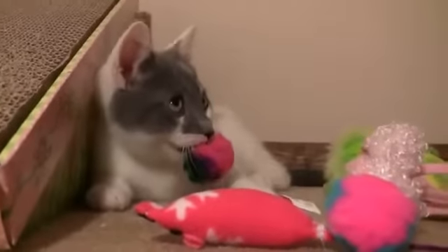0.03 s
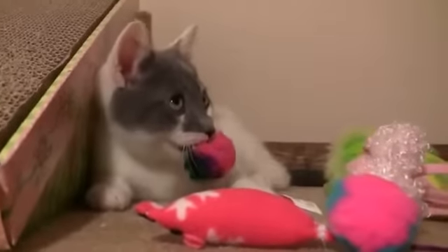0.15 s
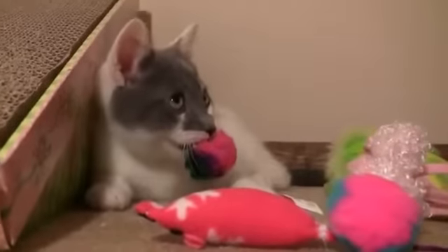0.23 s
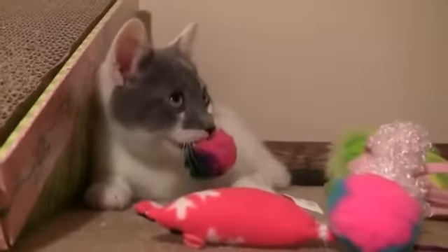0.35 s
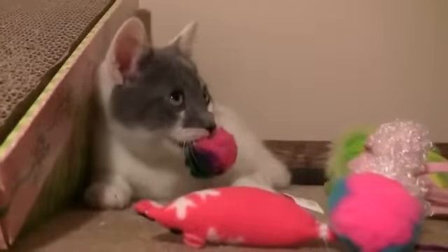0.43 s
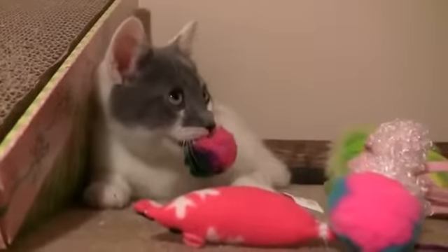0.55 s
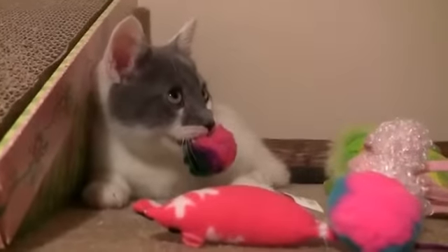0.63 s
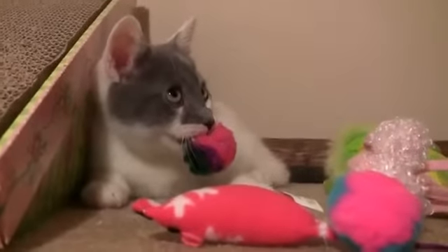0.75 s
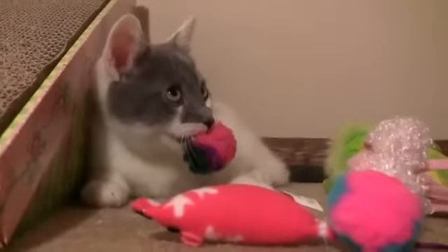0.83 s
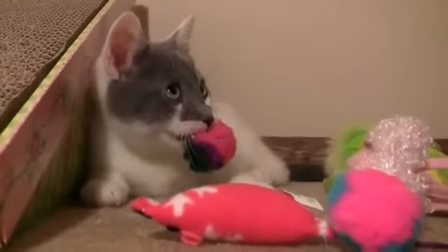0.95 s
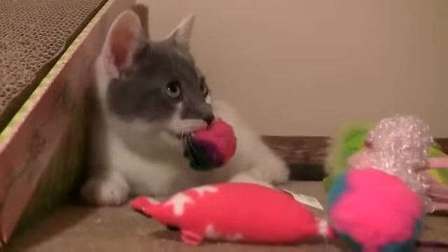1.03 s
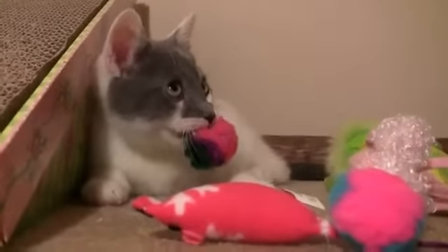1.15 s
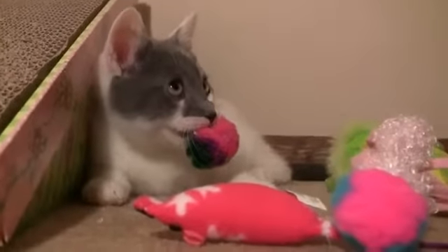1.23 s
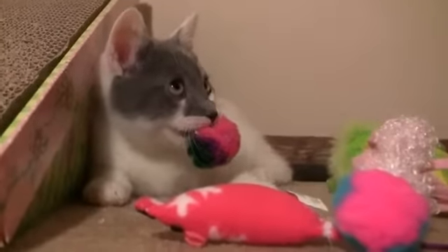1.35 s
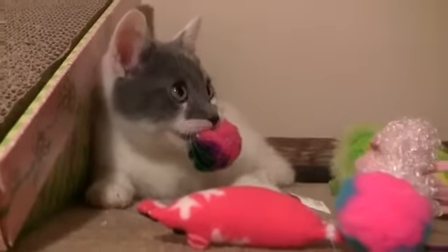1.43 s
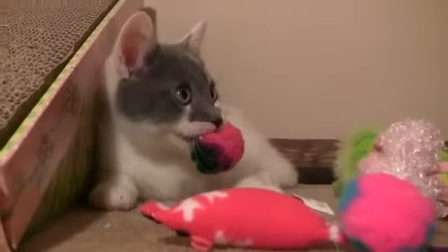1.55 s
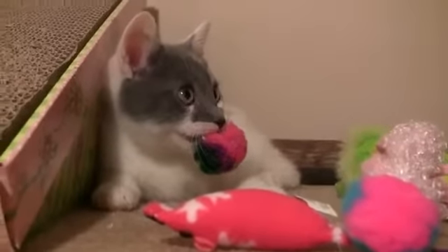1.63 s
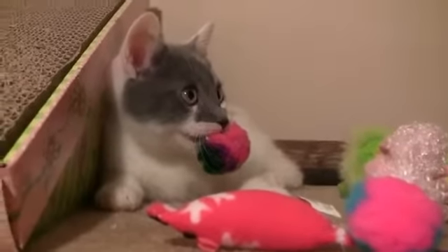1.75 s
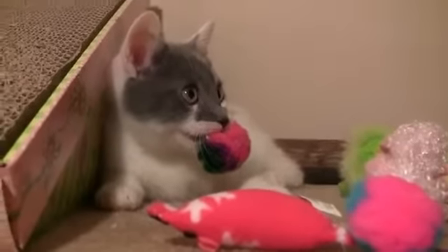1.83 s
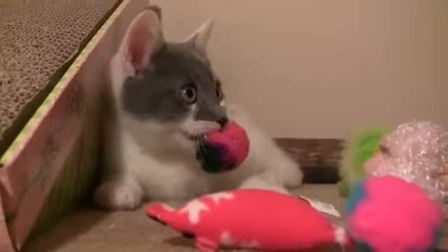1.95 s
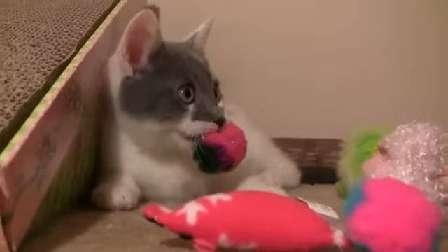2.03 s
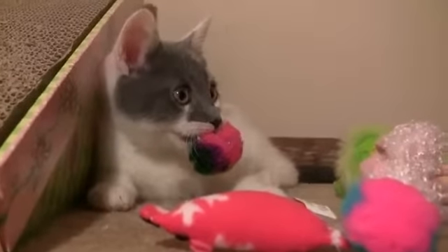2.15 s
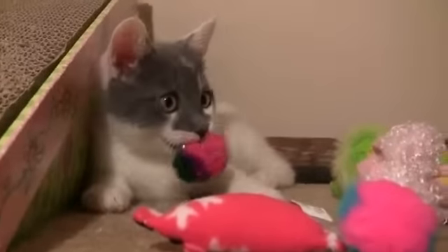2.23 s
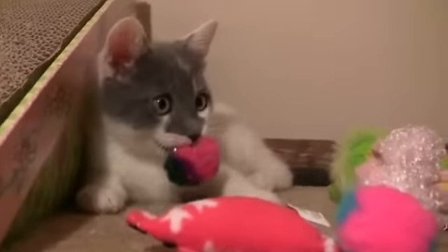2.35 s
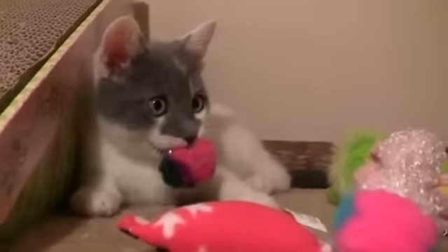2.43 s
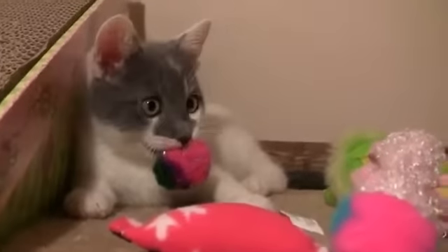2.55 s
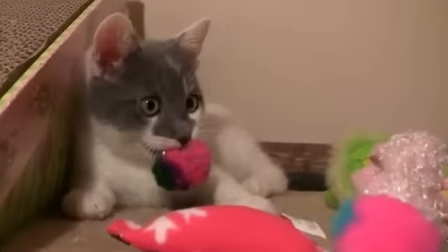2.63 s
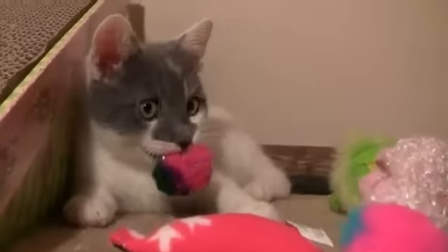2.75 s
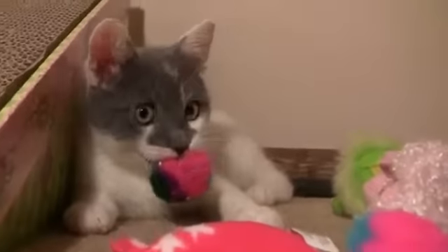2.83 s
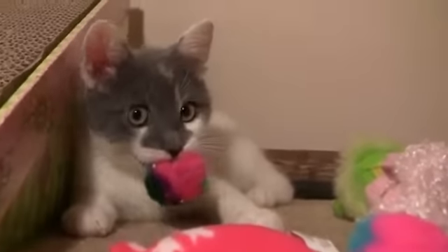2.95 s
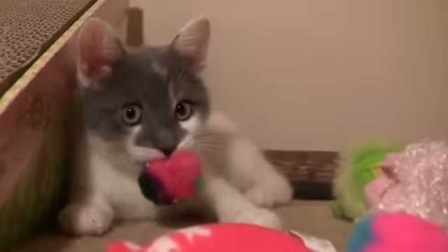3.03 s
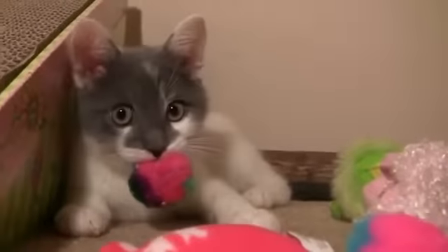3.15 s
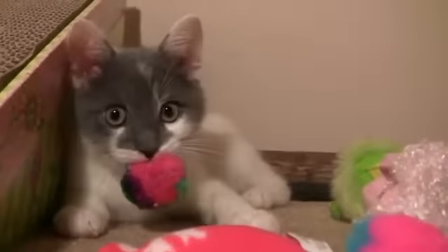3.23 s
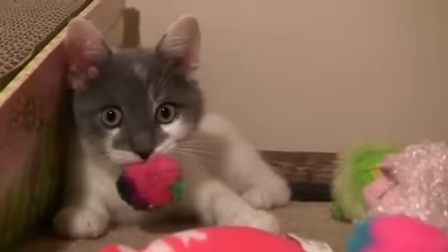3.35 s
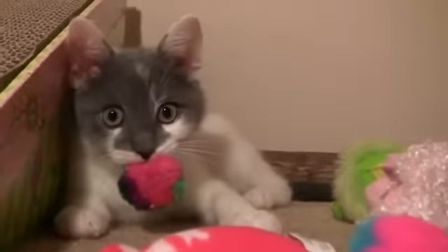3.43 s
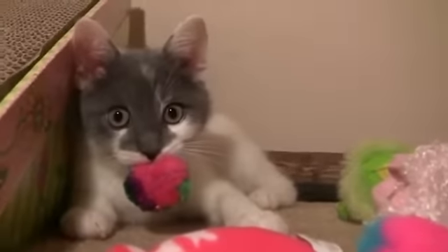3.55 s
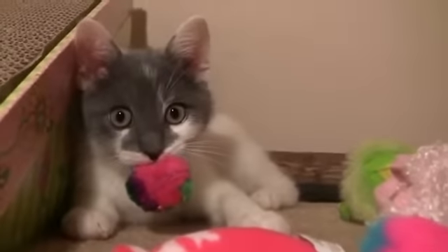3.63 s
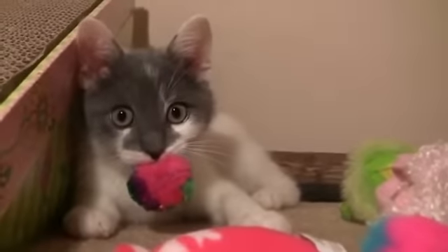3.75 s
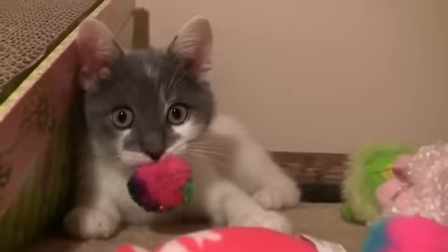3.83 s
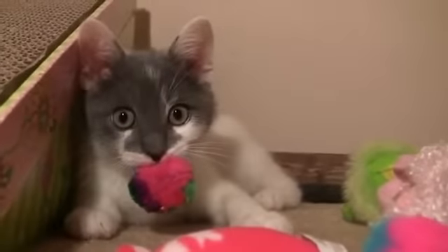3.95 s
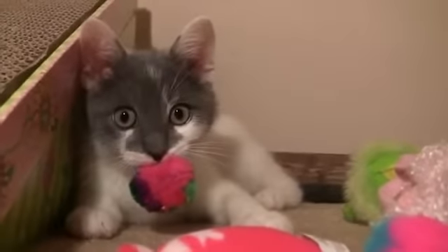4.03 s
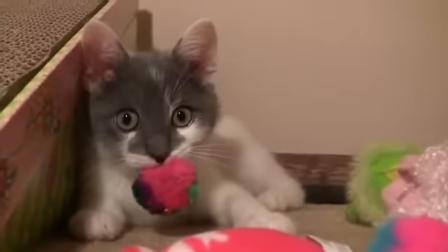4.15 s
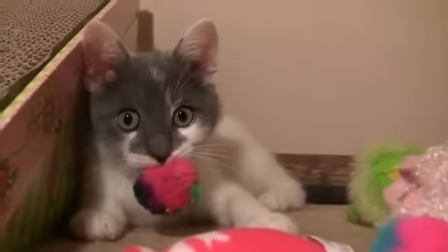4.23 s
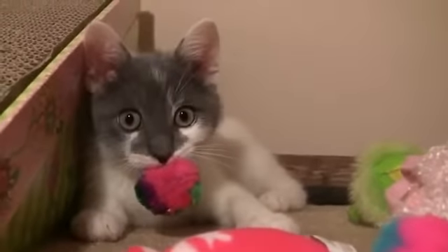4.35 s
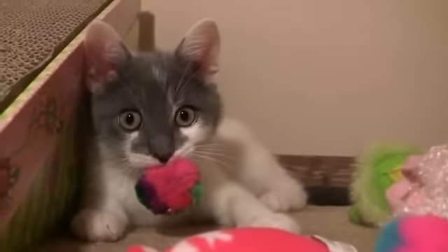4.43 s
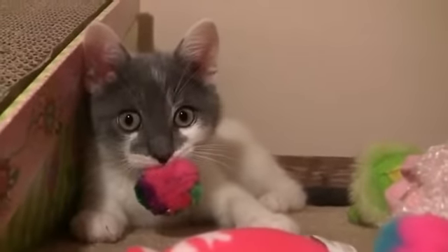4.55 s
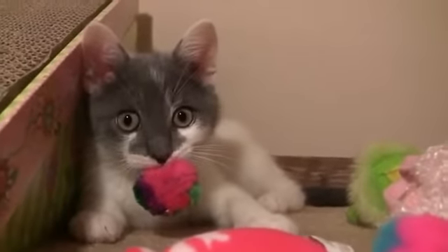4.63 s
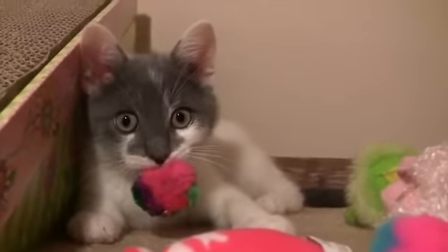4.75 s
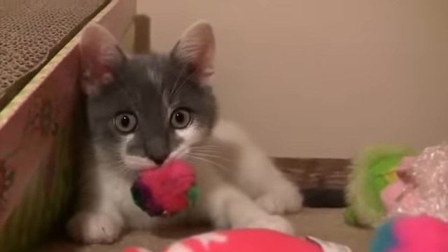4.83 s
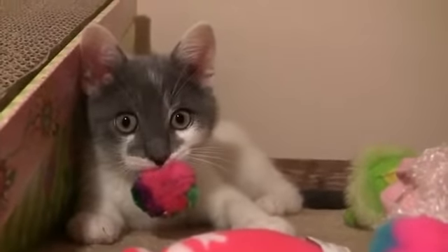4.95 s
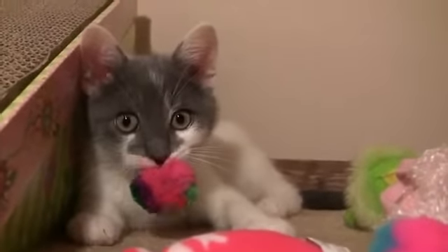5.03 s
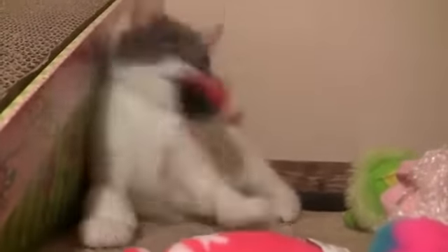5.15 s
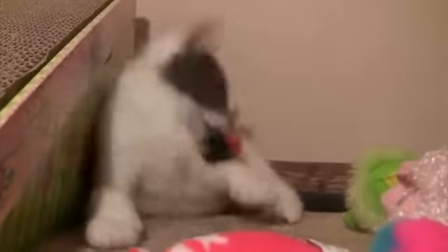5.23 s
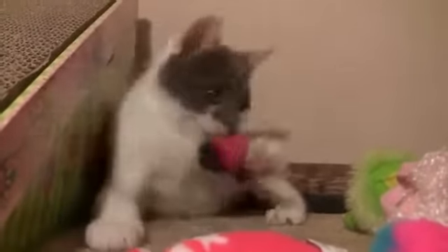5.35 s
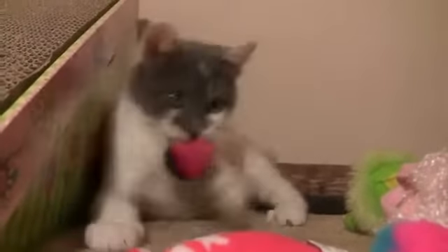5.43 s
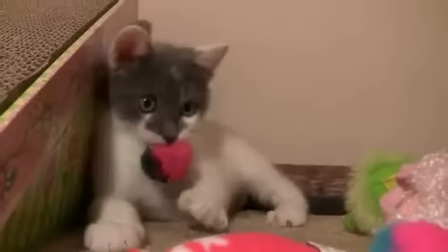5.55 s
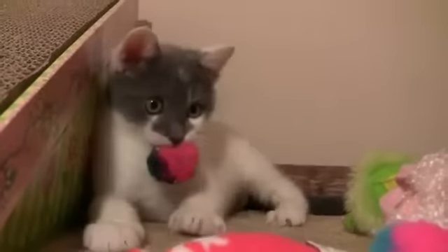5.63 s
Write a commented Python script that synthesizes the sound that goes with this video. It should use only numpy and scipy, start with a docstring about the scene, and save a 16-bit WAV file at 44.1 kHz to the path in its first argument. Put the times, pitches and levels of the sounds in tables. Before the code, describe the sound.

A kitten close to the microphone growls low and raspy with its mouth nearly closed on a toy, ending in a tiny spit. Fur brushes softly, a faint thump and small clicks follow, then a second, slightly harsher growl. After a pause it jerks the toy: claw ticks, scuffs and soft paw thumps in a small quiet room.

```python
"""Kitten growling over a toy

In a quiet room, close to the microphone, a kitten with a toy in its mouth growls twice and spits past it.
Its vocal folds swing at three rates at once, the upper two at fixed, uneven multiples of the pitch,
and slap shut unevenly, which makes the rasp. Fur brushes as filtered noise while it turns its head.
At the end it jerks the toy about: bursts of noise for the scratching claws, short rings for the clicks,
and floor modes struck by soft thumping paws.
"""
import sys
import numpy as np
from scipy import signal
from scipy.fft import rfft, irfft
from scipy.io import wavfile
from scipy.ndimage import uniform_filter1d

SR = 44100
rng = np.random.default_rng(int(sys.argv[2]) if len(sys.argv) > 2 else 0)


def log_audio(samples):
    """Write samples as a 16-bit WAV file to the path given in sys.argv[1]."""
    # one column per channel
    frames = np.atleast_2d(samples).T
    # limit to full scale, then quantise
    limited = np.clip(frames, -1, 1)
    pcm = np.round(limited * 32767).astype(np.int16)
    wavfile.write(sys.argv[1], SR, pcm)


N = 250488
TIME = np.arange(N) / SR  # seconds
MID_SIDE = np.array([[1], [-1]])  # sign of the side signal in the left and right channel


def undb(db):
    """Decibels to gain."""
    return 10 ** (np.asarray(db) / 20)


def unit(x):
    """Scale to rms 1."""
    return x / np.sqrt(np.mean(x ** 2) + 1e-20)


def noise():
    """White noise with spread 1 for the whole scene."""
    return rng.standard_normal(N)


def colour(x, points, size=4096):
    """Causal minimum-phase filter whose response passes through (Hz, dB) points."""
    hz, db = np.transpose(points)
    grid = np.maximum(np.fft.rfftfreq(size, 1 / SR), 1)
    response_db = np.interp(np.log(grid), np.log(hz), db)
    # folding the cepstrum forward in time gives the minimum phase
    cepstrum = irfft(np.log(undb(response_db)))
    cepstrum[1:size // 2] *= 2
    cepstrum[size // 2 + 1:] = 0
    impulse = irfft(np.exp(rfft(cepstrum)))
    return signal.fftconvolve(x, impulse)[:N]


def walk(rate):
    """Smooth chance with spread 1 that changes rate times a second."""
    k = max(int(SR / rate), 1)
    steps = np.repeat(rng.standard_normal(N // k + 1), k)
    return unit(uniform_filter1d(steps, k)[:N])


def hold(start, end, attack, release):
    """Envelope that rises from start, holds, and dies away after end."""
    rise = np.clip((TIME - start) / attack, 0, 1)
    return rise * np.exp(-np.maximum(TIME - end, 0) / release)


def burst(s, decay):
    """Noise that starts at s and dies away."""
    return noise() * (TIME >= s) * np.exp(-np.abs(TIME - s) / decay)


def steady(x, size):
    """Hold the rms near 1 over size samples, so that only the fast rattle is left."""
    local_power = np.abs(uniform_filter1d(x ** 2, size=size))
    return x / np.sqrt(local_power + np.mean(x ** 2) / 10 ** 2)


def swing(hz, jitter, shimmer_db):
    """One vibration of rms near 1, slightly unsteady in pitch and level."""
    phase = 2 * np.pi * np.cumsum(hz * (1 + jitter * walk(140))) / SR
    return np.sqrt(2) * np.sin(phase) * undb(shimmer_db * walk(70))


# Still air of the room. Each row: frequency in Hz, relative level in dB.
AIR = [(15, -44), (25, -20), (80, -3.5), (132, -8), (166, -1), (188, -5), (275, -9.5), (312, -4.5),
       (345, -8.5), (557, -8.5), (813, -9.5), (1070, -14), (1380, -17.5), (3020, -25.5), (10400, -33),
       (13500, -78.5), (22000, -120)]
# How much wider than deep the air is. Each row: frequency in Hz, side minus mid in dB.
AIR_SIDE = [(60, 0.93), (110, 2), (190, 3), (340, 4.9), (600, 2), (1080, 2.6), (1920, 5), (3410, 4.3),
            (6080, 3.3), (10800, 1)]
# Faint steady tones in the room. Each row: frequency in Hz, level in dB.
HUM = [(168, -69), (615, -64), (4944, -80.5)]
AIR_DB = -50.5


def air():
    """Wide, steady noise of the room, coloured apart for mid and side, with a faint hum in the middle."""
    mid = unit(colour(noise(), AIR))
    side = colour(unit(colour(noise(), AIR)), AIR_SIDE)
    hum = sum(undb(db) * swing(hz, jitter=.001, shimmer_db=2.5) for hz, db in HUM)
    return undb(AIR_DB) * (mid + side * MID_SIDE) + hum


# Tone of the brushing fur. Each row: frequency in Hz, relative level in dB.
FUR = [(200, -31), (450, 1.5), (700, 1.5), (1050, 1), (1500, -3), (2200, -9), (3200, -18), (6000, -34)]
# Fur strokes as the head turns. Each row: start in seconds, end in seconds, level at the start in dB.
STROKES = [(-.05, 0.474, -46), (0.527, 1.3, -50), (1.273, 1.64, -50.5), (1.682, 1.903, -49),
           (2.027, 2.54, -49)]
STROKE_ATTACK_S, STROKE_RELEASE_S, STROKE_FADE_DB_PER_S = 0.088, 0.066, 7


def brushing():
    """Fur slides softly and a little unevenly; each stroke fades as the head slows."""
    strokes = np.zeros(N)
    for start, end, db in STROKES:
        fading_db = db - STROKE_FADE_DB_PER_S * np.maximum(TIME - start, 0)
        strokes += hold(start, end, STROKE_ATTACK_S, STROKE_RELEASE_S) * undb(fading_db)
    uneven = noise() * undb(1.36 * walk(39.78))
    return unit(colour(uneven, FUR)) * strokes


# The two growls. Each row: start in seconds, break into the second swing in seconds, end in seconds,
# rasp level in dB, how much softer the voice begins in dB.
GROWLS = [(.084, 1.24, 1.435, -40, 2), (2.962, 3.97, 4.322, -37, 2.5)]
# Pitch of each growl, lowest near its end as the folds slacken. Each row: time in seconds, pitch in Hz.
PITCHES = [
    [(0.1, 162.2), (0.204, 146.8), (0.424, 148.9), (0.64, 151.8), (0.82, 143.4), (0.942, 156.1),
     (1.118, 152.1), (1.29, 137.8), (1.44, 132.2)],
    [(2.98, 146.4), (3.198, 144), (3.438, 154.9), (3.618, 156.0), (3.732, 149.7), (3.942, 145.6),
     (4.134, 139), (4.198, 137.5), (4.33, 130.3)],
]
# Tension shares out the motion: taut folds favour the main swing, slack ones fizz more.
# Each row: pitch in Hz, main swing in dB, second swing in dB, third swing in dB, mouth fizz in dB.
REGISTERS = [(131.6, -46, -42.5, -55.5, -56.5), (137.7, -39, -44.5, -41, -60),
             (146, -39, -44.5, -44.5, -60), (148.9, -37, -42, -44.5, -62), (155.8, -32, -41.5, -52, -63.5),
             (161, -34, -42, -50, -65)]
# Band in which the loose folds flutter at random. Each row: frequency in Hz, relative level in dB.
FLUTTER = [(60, -25.5), (95, -14), (120, -17), (150, -0.5), (180, 0), (230, -1), (270, -11.5), (400, -47.5)]
# Resonance of the throat. Each row: frequency in Hz, relative level in dB.
THROAT = [(150, -31), (272, -15), (318, 5), (368, -2), (412, -2), (460, 2.5), (600, 1.5), (820, 1),
          (1080, -10.5), (1330, -11), (1700, -22.5), (2600, -43.5), (5000, -76)]
# Resonance of the mouth, nearly closed on the toy. Each row: frequency in Hz, relative level in dB.
MOUTH = [(1500, -36), (2800, -10.5), (3300, -2), (3630, 1.5), (3950, -6.5), (4600, -19.5), (5500, -16),
         (6800, -33), (8900, -18.5), (10500, -48)]
# rates of the second and third swing, as multiples of the pitch
SECOND_RATIO, THIRD_RATIO = 1.4, 1.62
SWAY_DB, SWAY_RATE = 1.04, 16  # spread of the sway between swings, changes per second
GROWL_ATTACK_S, GROWL_RELEASE_S, SECOND_RELEASE_S = 0.027, 0.011, 0.027
# pressure builds after the start; rasp and fizz begin this much weaker
BUILD_S, RASP_BUILD_DB, FIZZ_BUILD_DB = 0.21, 11, 10
# late in each growl the slack folds break over: the second swing takes the lead and the rasp eases
BREAK_DB, BREAK_S, RASP_EASE_DB = 9.5, 0.077, 1.5
PUFF_DECAY_S = 0.019


def growl(row, pitch):
    """Three swings beat against each other; each inward turn is a slap, hardest when they line up."""
    start, breaks, end, rasp_db, soft_db = row
    hz = np.interp(TIME, *np.transpose(pitch))
    register_hz, *shares = np.transpose(REGISTERS)
    main_db, second_db, third_db, fizz_db = (np.interp(hz, register_hz, db) for db in shares)

    # the motion sways back and forth between the main swing and the other two
    sway_db = SWAY_DB * walk(SWAY_RATE)
    main_db, second_db, third_db = main_db + sway_db, second_db - sway_db, third_db - sway_db

    gate = hold(start, end, GROWL_ATTACK_S, GROWL_RELEASE_S)
    second_gate = hold(start, end, GROWL_ATTACK_S, SECOND_RELEASE_S)
    # share of the pressure that has yet to build up
    lack = np.exp(-np.maximum(TIME - start, 0) / BUILD_S)
    voice = undb(-soft_db * lack)
    broken = np.clip((TIME - breaks) / BREAK_S, 0, 1)
    main = gate * voice * undb(main_db)
    second = second_gate * voice * undb(second_db + BREAK_DB * broken)
    third = gate * voice * undb(third_db)
    rasp = gate * undb(rasp_db - RASP_BUILD_DB * lack - RASP_EASE_DB * broken)
    fizz = gate * undb(fizz_db - FIZZ_BUILD_DB * lack)
    effort = np.sqrt(main ** 2 + second ** 2 + third ** 2 + 1e-14)

    folds = main * swing(hz, jitter=.018, shimmer_db=2.04)
    folds += second * swing(hz * SECOND_RATIO, jitter=.022, shimmer_db=1.4)
    folds += third * swing(hz * THIRD_RATIO, jitter=.02, shimmer_db=2.1)
    folds += undb(-9.5) * effort * unit(colour(noise(), FLUTTER))
    # the tissue limits how far the folds swing, which evens out the beats
    opening = steady(folds / effort, size=720)

    # the folds only meet when they swing further than their resting gap (.85);
    # soft tissue cushions the hardest slaps
    turns = signal.argrelmin(opening)[0]
    slaps = np.zeros(N)
    slaps[turns] = np.tanh(np.maximum(-opening[turns] - .85, 0))
    slaps *= undb(1.2 * walk(250))

    # they press together and part again, so the pressure dips evenly before and after contact:
    # half the throat filter runs backward in time, half forward
    half_throat = [(f, db / 2) for f, db in THROAT]
    before_contact = colour(slaps[::-1], half_throat)[::-1]
    dips = -colour(before_contact, half_throat)

    # a puff of turbulent air follows every slap
    flow = signal.lfilter([1], [1, -np.exp(-1 / (PUFF_DECAY_S * SR))], slaps)
    throat = unit(dips) + .58 * unit(colour(flow * noise(), THROAT))
    # between teeth and toy the puffs fizz, some much more than others
    mouth = colour(flow ** 3.3 * noise() * undb(1.9 * walk(300)), MOUTH)
    return effort * opening + rasp * steady(throat, size=1300) + fizz * steady(mouth, size=2000)


# Spits past the toy as each growl ends.
# Each row: start in seconds, level before the mouth in dB, decay in seconds.
SPITS = [(1.443, -28, 0.0093), (1.457, -36, 0.012), (4.331, -29, 0.0073), (4.342, -28.5, 0.0043)]


def spits():
    """Short spurts through the narrow mouth when the folds let go."""
    spurts = sum(undb(db) * burst(s, decay) for s, db, decay in SPITS)
    return colour(spurts, MOUTH)


# Soft blows on the floor. Each row: start in seconds, peak level in dB, contact time in seconds.
THUMPS = [(1.893, -38.5, 0.0018), (5.36, -32, 0.0013), (5.366, -30, 0.0004), (5.379, -24, 0.0017),
          (5.385, -27, 0.0027), (5.395, -26, 0.0033)]
# Modes of the floor. Each row: frequency in Hz, relative level in dB, time to fall 60 dB in seconds.
FLOOR_MODES = [(95, -17.5, 0.4), (192, -14.5, 0.16), (222, -7, 0.18), (284, 4, 0.047), (381, 9.5, 0.035),
               (496, -1, .04), (740, 1, 0.036), (892, 13, 0.037), (1270, -9, .025)]


def thumps():
    """Each blow pushes the floor's modes; a longer contact sounds duller."""
    t = TIME[:SR // 2]
    ring = np.zeros(len(t))
    for hz, db, t60 in FLOOR_MODES:
        ring += undb(db) * np.cos(2 * np.pi * hz * t) * np.exp(-np.log(1000) * t / t60)
    out = np.zeros(N)
    for s, db, contact in THUMPS:
        push = np.sin(np.pi * np.minimum(t / contact, 1)) ** 2
        blow = signal.fftconvolve(ring, push)[:len(t)]
        blow = undb(db) * blow / np.abs(blow).max()
        start = int(s * SR)
        out[start:start + len(t)] += blow[:N - start]
    return out


# Small dry clicks. Each row: start in seconds, level in dB, ring in Hz, decay in seconds.
CLICKS = [(2.511, -41, 5000, 0.00042), (2.59, -50, 4700, .0003), (2.6723, -33.5, 850, .002),
          (5.134, -28, 1190, 0.00062), (5.57, -41, 1460, 0.0018)]
# Claws snagging. Each row: start in seconds, level before the claw tone in dB, decay in seconds.
SNAGS = [(5.2, -32, .002), (5.2187, -26.5, .0018), (5.23, -30, .0014), (5.238, -34, 0.0024),
         (5.304, -32, 0.0012), (5.5, -33, 0.00095), (5.5691, -26.5, 0.00091)]
# Bright tone of the claws. Each row: frequency in Hz, relative level in dB.
CLAW = [(1000, -14), (3000, -11.5), (5500, -17), (7500, -2.5), (9000, 2), (10500, -5.5)]
# the bright snap that starts every click, its level relative to the click's ring
SNAP_HZ, SNAP_DB, SNAP_DECAY_S = 3900, -12, 0.00066


def ticks():
    """Bright claw snags, and small clicks that snap and ring for a few cycles at most."""
    out = colour(sum(undb(db) * burst(s, decay) for s, db, decay in SNAGS), CLAW)
    for s, db, hz, decay in CLICKS:
        age = np.maximum(TIME - s, 0)
        ring = np.sin(2 * np.pi * hz * age) * np.exp(-age / decay)
        snap = undb(SNAP_DB) * np.sin(2 * np.pi * SNAP_HZ * age) * np.exp(-age / SNAP_DECAY_S)
        out = out + undb(db) * (ring + snap + 0.17 * burst(s, decay / 2))
    return out


# Tone of paws and toy on the floor. Each row: frequency in Hz, relative level in dB.
SCUFF = [(90, -12), (200, 0.5), (500, 2), (950, -2.5), (1400, -7.5), (2000, -12), (2900, -20.5),
         (4400, -19.5), (7000, -25), (10000, -37)]
# Paws and toy scuffing. Each row: peak in seconds, level in dB, rise in seconds.
SCUFFS = [(5.24, -56, 0.018), (5.36, -38, 0.058), (5.464, -47.5, 0.04), (5.68, -49, 0.031)]
# Claws dragging through fibres. Each row: start in seconds, end in seconds, level in dB.
DRAGS = [(5.186, 5.213, -50.5), (5.304, 5.448, -51), (5.48, 5.552, -58.5)]
SCUFF_FALL_S, DRAG_ATTACK_S, DRAG_RELEASE_S = 0.039, 0.017, .015


def jerk():
    """Paws and toy scuff in fits and starts while fibres crackle under the claws."""
    pushes = np.zeros(N)
    for s, db, rise in SCUFFS:
        pushes += undb(db) * np.exp(-np.maximum((s - TIME) / rise, (TIME - s) / SCUFF_FALL_S))
    drags = sum(undb(db) * hold(start, end, DRAG_ATTACK_S, DRAG_RELEASE_S) for start, end, db in DRAGS)
    scuff = unit(colour(noise() * undb(2.0 * walk(180)), SCUFF))
    crackle = unit(colour(noise() * undb(2.0 * walk(900)), CLAW))
    return scuff * pushes + crackle * drags


def room(x, wet_db, t60):
    """Direct sound plus a short scatter from walls and floor, weak in the bass, different left and right."""
    t = TIME[:SR // 2]
    # the scatter arrives 3 ms after the direct sound
    tails = rng.standard_normal((2, len(t))) * np.exp(-np.log(1000) * t / t60) * (t > .003)
    tails /= np.sqrt(np.sum(tails ** 2, axis=1, keepdims=True))
    mid, side = (signal.fftconvolve(x, tail)[:N] for tail in tails)
    mid = colour(mid, [(220, -10.5), (550, 0.5)])
    side = colour(side, [(150, -16.5), (400, -11), (1200, 1)])
    return x + undb(wet_db) * (mid + side * MID_SIDE)


def scene():
    """Voice, rubbing and blows, each with its share of the room, over the still air."""
    growls = sum(growl(row, pitch) for row, pitch in zip(GROWLS, PITCHES))
    voice = room(growls + spits(), wet_db=-9, t60=.18)
    rubbing = room(brushing() + jerk(), wet_db=-11.5, t60=0.18)
    blows = room(ticks() + thumps(), wet_db=-8, t60=0.32)
    balance_db = np.array([[-.35], [.35]])  # left, right
    return (voice + rubbing + blows + air()) * undb(balance_db)


TOP_HZ = 10450


def record(dry):
    """The recorder cuts the top steeply."""
    low_pass = signal.ellip(12, .2, 80, TOP_HZ, fs=SR, output="sos")
    return signal.sosfilt(low_pass, dry)


dry = scene()
out = record(dry)
log_audio(out)
```